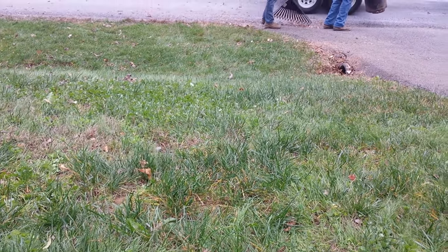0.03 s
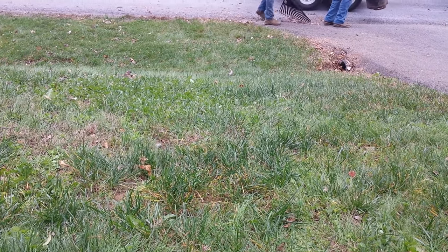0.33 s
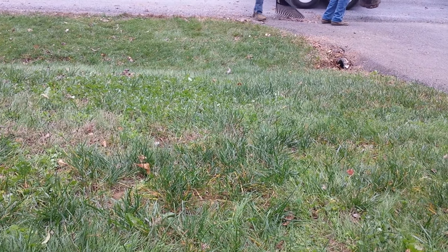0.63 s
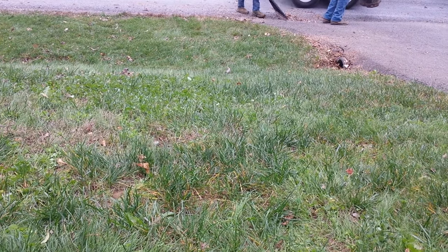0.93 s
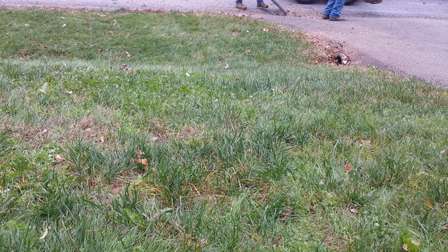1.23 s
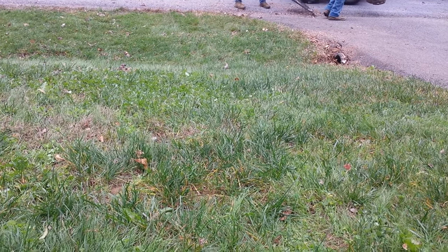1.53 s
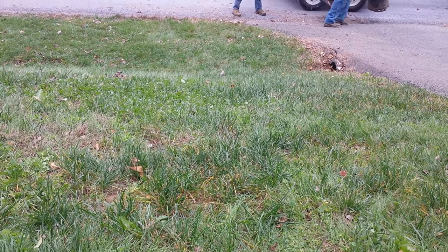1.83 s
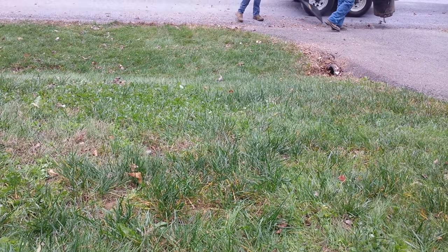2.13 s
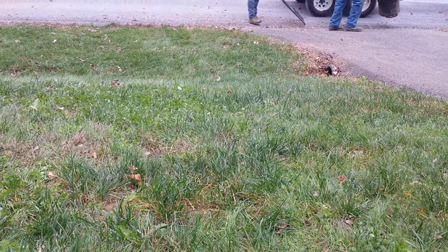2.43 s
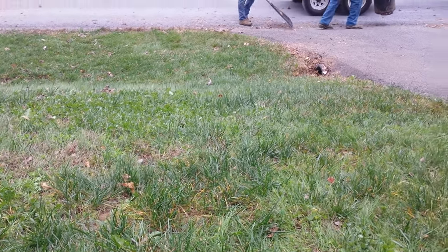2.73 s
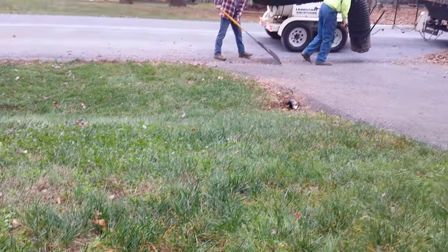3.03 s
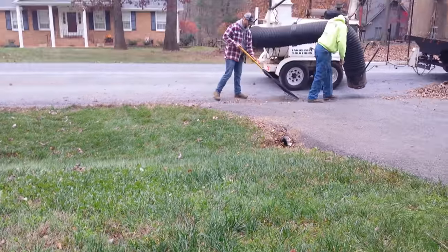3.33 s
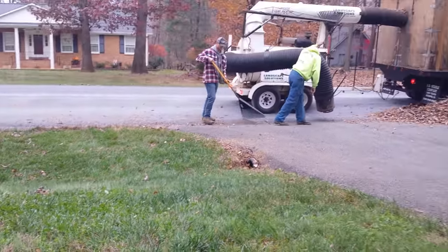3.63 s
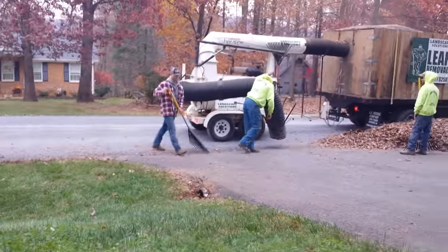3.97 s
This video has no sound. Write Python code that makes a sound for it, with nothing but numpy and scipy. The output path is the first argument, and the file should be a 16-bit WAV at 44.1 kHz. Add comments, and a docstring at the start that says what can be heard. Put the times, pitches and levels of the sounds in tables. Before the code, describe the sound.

The engine drone and rushing fan of a leaf vacuum carry across a roadside lawn. Beside it, a metal rake scratches and clicks on the pavement in two spells, and the hiss shifts tone near the end.

```python
"""A trailer-mounted leaf vacuum runs steadily across a lawn from start to end: a firing drone over a
lumpy exhaust rumble, with the rush and hiss of the suction fan. From about one second a wire rake
catches, scrapes and clatters on the asphalt beside it, its tines ringing. The rake rests after two
seconds and returns near the end, as the microphone tilts up to face the machine and the fan noise
changes colour."""
import sys
import numpy as np
from scipy import signal
from scipy.fft import rfft, irfft
from scipy.io import wavfile

SR = 44100
rng = np.random.default_rng(int(sys.argv[2]) if len(sys.argv) > 2 else 0)


def store_pcm(level_fs):
    """Save levels as 16-bit WAV."""
    pcm = np.round(np.clip(level_fs, -1, 1) * 32767).astype(np.int16)
    wavfile.write(sys.argv[1], SR, np.atleast_2d(pcm).T)


N = 176400
T = np.arange(N) / SR
FREQS = np.maximum(np.arange(N // 2 + 1) * SR / N, 1)
CRANK_HZ = 47.76  # governed crankshaft speed

# Stereo balance of the two microphone ports. Each row: frequency in Hz, left minus right in dB.
PORT_BALANCE = [(50, -0.2), (150, 1.5), (300, -0.5), (400, 2.5), (560, 4), (700, -1), (930, 4), (1120, -2),
                (1300, 2), (1500, 8.5), (1750, 3), (2050, 10.5), (2450, 12.5), (2700, 15.5), (3100, -6),
                (3900, 3.5), (4600, 0.5), (5400, 13.5), (6100, 16.5), (7200, 7), (8300, 2), (10000, -1),
                (12000, -15), (14000, -13.5), (15500, -14)]
# Phase between the ports. Each row: frequency in Hz, lead of the left port in radians.
PORT_PHASE = [(50, 0.28), (150, 0), (400, 0.59), (700, 0.44), (1000, 0.95), (1300, 1.44), (1900, 1.5),
              (2400, 0.9), (2900, -0.5), (4000, -2), (6000, -3), (9000, -1.5)]


def leaf_vacuum():
    """One slowly wandering crankshaft times the drone and the fan's throb, over the exhaust rumble."""
    speed_hz = CRANK_HZ * (1 + 0.0018 * drift(1.85))
    crank = 2 * np.pi * np.cumsum(speed_hz) / SR
    return exhaust_rumble() + fan_rush(crank) + fan_hiss(crank) + engine_drone(crank)


def engine_drone(crank):
    """A deep thud for every turn under a stack of engine orders; the third is the firing note."""
    # Each row: multiple of the crank speed, relative level in dB, flutter depth from 0 to 1.
    orders = [(2, -13.5, 0.34), (2.5, -15.5, .5), (3, 1.5, 0.1), (3.5, -19, 0.4), (4, -14.5, 0.29),
              (5, -21.5, 0.8), (6, -13.5, 0.29), (8, -35, 0.7), (9, -28.5, 0.44)]
    # Fader rides of the drone and the thud. Each row: time in seconds, relative level in dB.
    drone_level = [(0, -14.5), (.75, -13.5), (.9, -15.5), (1.05, -13.5), (1.45, -16), (1.76, -21.5),
                   (1.86, -20), (2.1, -21.5), (2.8, -22.5), (3.1, -25), (3.5, -17), (4, -21)]
    thud_level = [(0, -27.5), (1.35, -29), (1.8, -34), (2.5, -34), (3.1, -28), (4, -31)]
    drone = sum(amp(db) * engine_tone(crank, multiple, flutter) for multiple, db, flutter in orders)
    thud = engine_tone(crank, 1, flutter=0.054)
    return amp(in_time(drone_level) - 0.5) * drone + amp(in_time(thud_level)) * thud


def engine_tone(crank, multiple, flutter):
    """One engine order at the two ports, fluttering in strength and phase."""
    tone = np.exp(1j * (multiple * crank + rng.uniform(0, 2 * np.pi)))
    tone *= 1 + flutter * (drift(24) + 1j * drift(5.2))
    pitch_bin = np.searchsorted(FREQS, multiple * CRANK_HZ)
    left_over_right = amp(per_hz(PORT_BALANCE)[pitch_bin]) * np.exp(1j * per_hz(PORT_PHASE)[pitch_bin])
    return rms_one(np.real(tone * left_over_right ** np.array([[.5], [-.5]])))


def exhaust_rumble():
    """The exhaust: low noise with a lumpy spectrum, swelling and easing."""
    # Tone of the rumble. Each row: frequency in Hz, relative level in dB.
    spectrum = [(20, -27), (36, -30), (60, -12), (85, -5), (115, -5.5), (144, -3), (172, -1), (200, -4),
                (235, -2), (260, -9.5), (295, -2.5), (340, -22.5), (420, -15)]
    # Fader ride. Each row: time in seconds, relative level in dB.
    level = [(0, -20.5), (.7, -22.5), (.9, -18), (1.05, -21.5), (1.4, -21.5), (1.8, -26), (2.0, -25.5),
             (2.4, -24.5), (2.8, -27), (2.95, -22), (3.3, -19.5), (3.6, -19.5), (4, -23)]
    return amp(in_time(level) + 0.5) * noise(spectrum)


def fan_rush(crank):
    """The suction fan's flickering midrange rush throbs with every turn and every firing."""
    # Tone aimed at the grass, then at the machine. Each row: frequency in Hz, relative level in dB.
    aside = [(310, -1.5), (350, -4.5), (390, 1), (440, 3.5), (510, -6.5), (600, 0.5), (700, 1), (810, -10),
             (960, -4.5), (1080, -8), (1280, -5.5), (1450, -10.5), (1700, -11), (2000, -10), (2150, -8),
             (2260, -8), (2380, -6), (2660, -7.5), (2900, -17), (3300, -19.5), (3800, -25)]
    facing = [(190, -39), (330, -15), (344, -35), (369, 2), (401, 2), (668, 1.5), (845, -7), (1130, -5),
              (1400, -10), (2040, -3), (2770, -11.5), (3190, -21), (3800, -20.5), (4940, -48), (8360, -120)]
    # Fader ride. Each row: time in seconds, relative level in dB.
    level = [(0, -24.5), (1.35, -25), (1.6, -27.5), (1.9, -31), (2.1, -31), (2.7, -30.5), (2.95, -25.5),
             (3.3, -24.5), (3.6, -23), (4, -23)]
    flicker_db = 1.01 * drift(30)
    throb = 1 + 0.095 * np.cos(crank) + 0.16 * np.cos(3 * crank)
    return amp(in_time(level) + flicker_db) * throb * tilting_noise(aside, facing)


def fan_hiss(crank):
    """The bright hiss of the suction flickers and pulses lightly once a turn."""
    # Tone aimed at the grass, then at the machine. Each row: frequency in Hz, relative level in dB.
    aside = [(2060, -8), (3500, -25), (3800, -14.5), (4430, -10.5), (6320, 2.5), (8630, -14), (11000, -22),
             (14400, -23.5), (15500, -30)]
    facing = [(2060, -32), (3500, -10), (4350, -9), (4960, -4.5), (5870, 4.5), (6810, -1), (7530, -4),
              (9070, -15), (13800, -18), (15500, -27)]
    # Fader ride. Each row: time in seconds, relative level in dB.
    level = [(0, -29.5), (1.2, -30.5), (1.8, -30), (2.15, -33), (2.65, -32.5), (3.0, -30.5), (3.45, -29),
             (3.7, -33), (4, -32)]
    flicker_db = 0.84 * drift(25)
    throb = 1 + 0.04 * np.cos(crank)
    return amp(in_time(level) - 1 + flicker_db) * throb * tilting_noise(aside, facing)


def rake():
    """Drags and catches drive grit into the tines and the rake's head; hard catches open with a click."""
    # Bright tone of the click. Each row: frequency in Hz, relative level in dB.
    click_spectrum = [(3800, -14.5), (6000, 15), (9000, -21), (15000, -22)]
    catch_power, clicks = tine_catches()
    force = np.sqrt(catch_power + drag_power())
    ticks = grit()
    scrape = force * (tine_rasp(ticks) + amp(-12) * rake_head(ticks))
    ring = amp(-12.5) * tine_ring((force + clicks) * ticks)
    return scrape + clicks * noise(click_spectrum) + ring


def tine_catches(attack_s=0.0027, click_decay_s=0.00085):
    """Tines catch and spring free: the power envelope of the rasps and the envelope of the clicks."""
    # Each row: start in seconds, relative rasp level in dB, decay in seconds, relative click level in dB.
    catches = [(0.968, -26, 0.017, -37), (1.174, -24.5, 0.014, -30), (1.229, -27.5, .018, -30),
               (1.271, -21.5, 0.011, -32), (1.313, -16.5, 0.012, -14), (1.386, -22.5, 0.043, -25),
               (1.449, -13.5, 0.012, -17), (1.468, -20, 0.011, -25), (1.507, -26, 0.025, -25),
               (1.601, -16, .014, -22), (1.655, -18.5, .024, -27), (1.681, -23.5, .04, -22),
               (1.724, -17.5, 0.021, -25), (1.753, -16, 0.015, -28), (1.788, -16.5, 0.017, -28),
               (1.796, -18, 0.0054, -28), (1.893, -18.5, 0.027, -3), (2.037, -26, 0.0087, -10),
               (2.732, -26, .017, -27), (2.758, -25, 0.03, -15), (2.951, -22.5, 0.014, -20),
               (3.099, -23.5, 0.023, -8), (3.199, -23.5, 0.023, -12), (3.212, -18, .012, -25),
               (3.238, -17, 0.009, -25), (3.311, -16.5, 0.013, -28), (3.324, -21, 0.012, -13)]
    power, clicks = np.zeros(N), np.zeros(N)
    for start, rasp_db, decay_s, click_db in catches:
        age = np.maximum(T - start, 0)
        attack = np.minimum(age / attack_s, 1)
        power += (amp(rasp_db + 0.5) * attack * np.exp(-age / decay_s)) ** 2
        clicks += amp(click_db - 7) * (T >= start) * np.exp(-age / click_decay_s)
    return power, clicks


def drag_power(attack_s=0.01, release_s=0.014):
    """Power envelope of the tines dragging over asphalt, sticking and slipping unevenly."""
    # Each row: start in seconds, length in seconds, level in dB.
    drags = [(1.491, 0.071, -24), (1.583, 0.14, -25), (2.762, 0.068, -27), (3.125, .06, -32),
             (3.197, 0.098, -25), (3.31, 0.057, -26), (3.619, 0.06, -33.5), (3.855, 0.019, -31)]
    judder_db = drift(70)
    power = np.zeros(N)
    for start, length, db in drags:
        attack = np.clip((T - start) / attack_s, 0, 1)
        release = np.exp(-np.maximum(T - start - length, 0) / release_s)
        power += (amp(db + judder_db) * attack * release) ** 2
    return power


def grit(ticks_per_s=2000, tick_share=0.36):
    """Dense uneven ticks of wire on stone over a smooth scrape."""
    hits = rng.random(N) < ticks_per_s / SR
    ticks = rms_one(hits * rng.standard_normal((2, N)))
    smooth = rng.standard_normal((2, N))
    return np.sqrt(tick_share) * ticks + np.sqrt(1 - tick_share) * smooth


def tine_rasp(ticks, switch_s=2.4):
    """Grit takes the bright colour of the tines, which switches while the rake rests."""
    # Tone aimed at the grass, then at the machine. Each row: frequency in Hz, relative level in dB.
    aside = [(3000, -10), (3800, -32), (4400, -23), (4900, -9), (5500, -2), (6200, 3.5), (7300, -1),
             (8300, -8.5), (9500, -19), (11000, -18), (14000, -19.5), (15500, -28)]
    facing = [(3000, -23), (4200, -16), (5000, -14), (5950, 3), (6600, 1.5), (8000, -11), (10000, -16.5),
              (12000, -18), (14000, -19), (15500, -23)]
    early = at_ports(ticks, colour(aside))
    late = at_ports(ticks, colour(facing), tilted=True)
    return np.where(T < switch_s, early, late)


def rake_head(ticks, hz=2360, width_hz=370):
    """The rake's head answers the grit with a single resonance."""
    return at_ports(ticks, 1 / (1 + 1j * (FREQS - hz ** 2 / FREQS) / width_hz))


def tine_ring(force):
    """Narrow modes of the wire tines ring on after the scraping force that drives them."""
    # Each row: frequency in Hz, relative level in dB, seconds to fall by 60 dB.
    modes = [(5400, 3, 0.092), (6160, -3, .12), (6320, 0, 0.033), (6300, -2, 0.077), (6280, 0, 0.055)]
    ring = 0
    for hz, db, t60 in modes:
        radius, angle = amp(-60 / (t60 * SR)), 2 * np.pi * hz / SR
        feedback = [1, -2 * radius * np.cos(angle), radius ** 2]
        ring = ring + amp(db) * signal.lfilter([0, np.sin(angle)], feedback, force + 1e-18)
    return force.std() * at_ports(ring, 1)


def tilting_noise(aside, facing, start_s=2.72, end_s=3.46):
    """Noise crossfades between two colours as the microphone tilts up."""
    share = np.clip((T - start_s) / (end_s - start_s), 0, 1)
    return np.sqrt(1 - share) * noise(aside) + np.sqrt(share) * noise(facing, tilted=True)


def noise(spectrum, tilted=False):
    """Stereo noise with the given spectrum."""
    return at_ports(rng.standard_normal((2, N)), colour(spectrum), tilted)


def at_ports(pair, gain, tilted=False):
    """Two unrelated signals become one coloured sound at the microphone ports; its mid has rms 1."""
    # How alike the ports sound. Each row: frequency in Hz, likeness from 0 to 1.
    likeness = [(100, .998), (300, 1), (700, 1), (1300, 0.94), (1700, 0.6), (2200, 0.69), (3000, 0.64),
                (6000, 0.3), (9000, 0.14)]
    # What the tilt adds to the balance. Each row: frequency in Hz, left minus right in dB.
    tilt_balance = [(300, 4), (500, -0.5), (700, 2), (1150, 3), (1750, 4), (2100, 3), (2450, -6), (3000, 4),
                    (4500, -4.5), (6000, -3.5), (9000, -1.5), (13000, 7)]
    balance, phase = per_hz(PORT_BALANCE), per_hz(PORT_PHASE)
    if tilted:
        balance, phase = balance + per_hz(tilt_balance), phase * 0.75
    sides = np.array([[1], [-1]])
    port = (amp(balance) * np.exp(1j * phase)) ** (sides / 2)
    alike = np.clip(per_hz(likeness), 0, .9995)
    common_gain, apart_gain = port * np.sqrt(1 + alike), port * np.sqrt(1 - alike) * sides
    mid_gain = np.hypot(abs(common_gain.sum(0)), abs(apart_gain.sum(0)))
    common, apart = rfft(pair)
    stereo = irfft(gain * (common_gain * common + apart_gain * apart) / mid_gain, N)
    return stereo / stereo.mean(0).std()


def colour(spectrum):
    """EQ curve through rows of Hz and dB, falling steeply beyond its ends."""
    outside = np.minimum(FREQS / spectrum[0][0], 1) * np.minimum(spectrum[-1][0] / FREQS, 1)
    return amp(per_hz(spectrum)) * outside ** 8


def per_hz(rows):
    """A table read along log frequency."""
    hz, value = np.transpose(rows)
    return np.interp(np.log(FREQS), np.log(hz), value)


def in_time(rows):
    """A table read at every sample."""
    return np.interp(T, *np.transpose(rows))


def drift(rate_hz):
    """Random wander of rms 1, mostly slower than the given rate."""
    return rms_one(irfft(rfft(rng.standard_normal(N)) / (1 + (FREQS / rate_hz) ** 2), N))


def amp(db):
    """Decibels to gain."""
    return 10 ** (np.asarray(db) / 20)


def rms_one(x):
    """Scale to unit rms."""
    return x / np.sqrt(np.mean(x ** 2) + 1e-20)


def scene():
    """The leaf vacuum with the rake beside it."""
    return leaf_vacuum() + rake()


def record(dry):
    """Peaks stop at full scale and a steep low-pass cuts the top."""
    low_pass = signal.cheby2(16, 70, 16400, fs=SR, output="sos")
    return signal.sosfilt(low_pass, np.clip(dry, -1, 1))


dry = scene()
out = record(dry)
store_pcm(out)
```